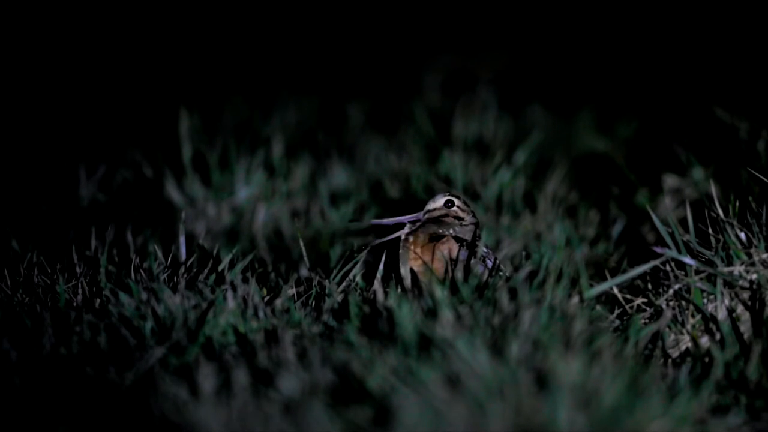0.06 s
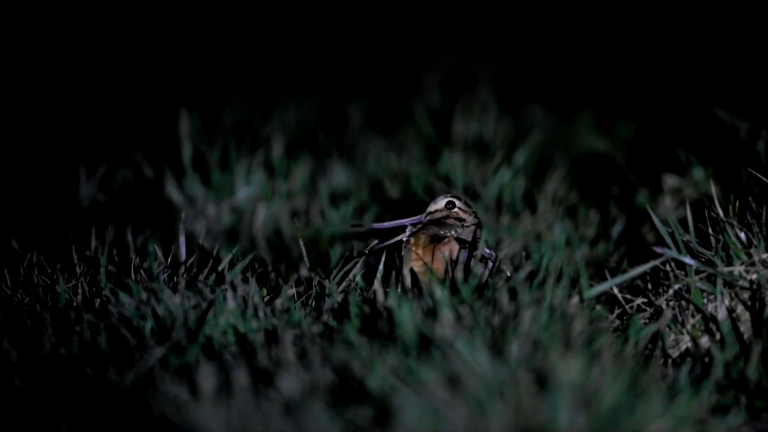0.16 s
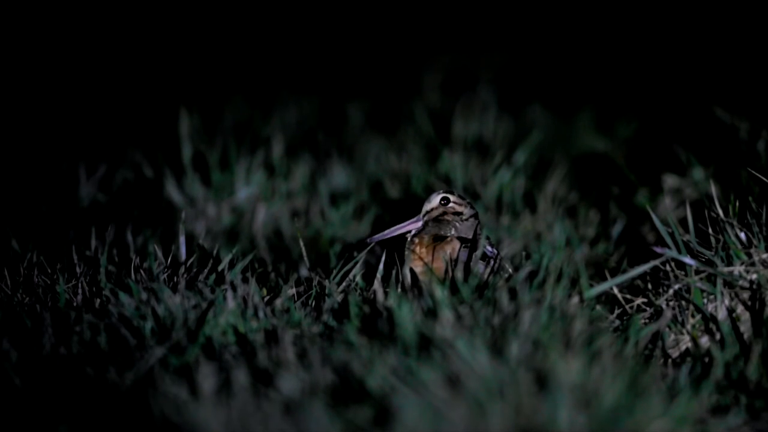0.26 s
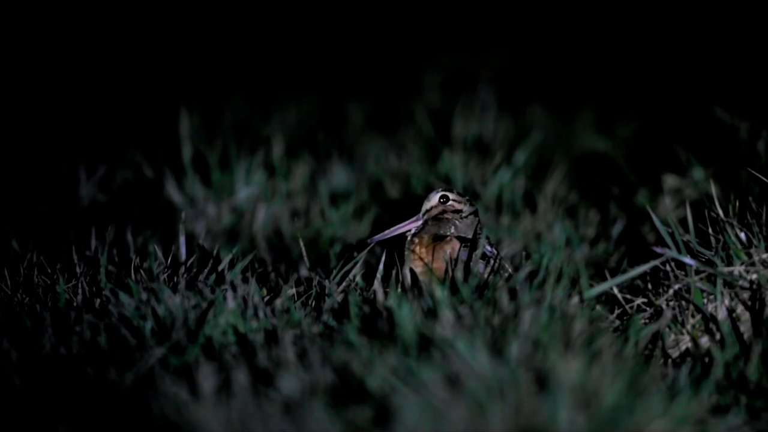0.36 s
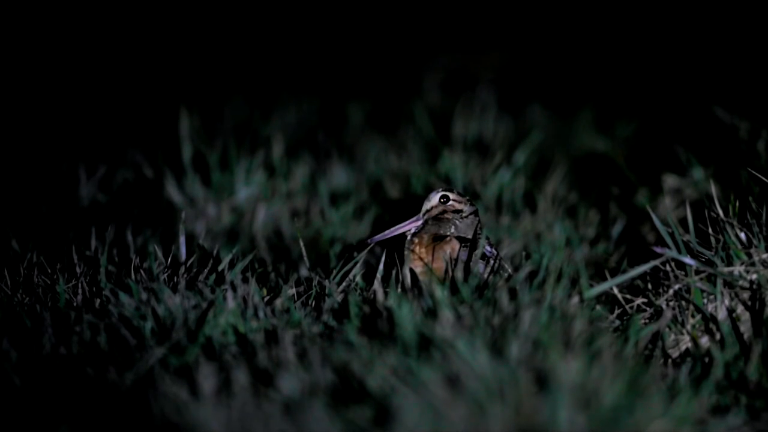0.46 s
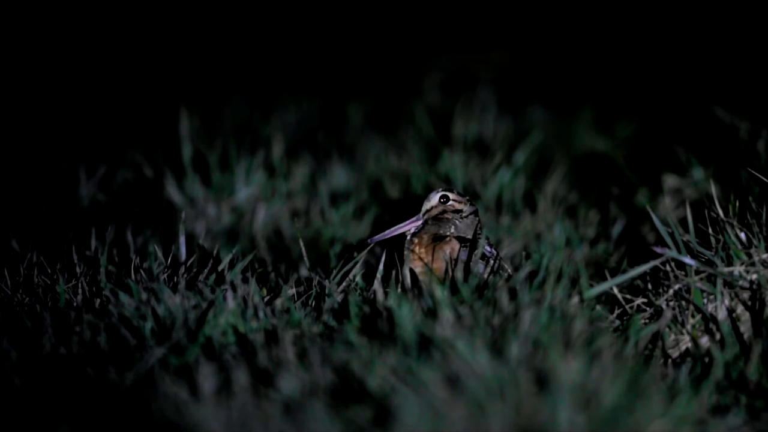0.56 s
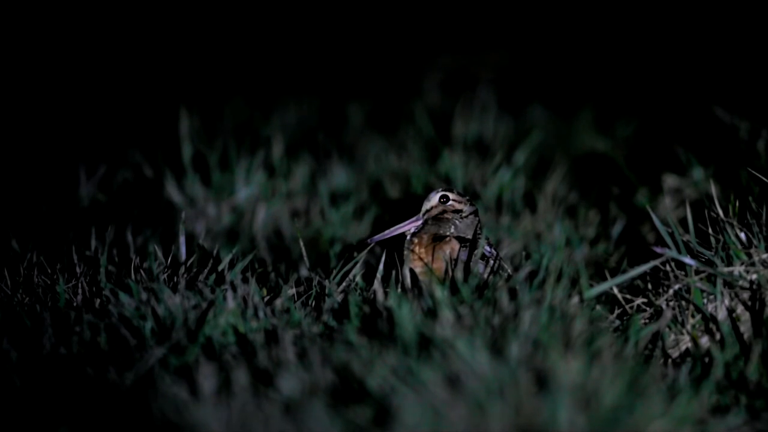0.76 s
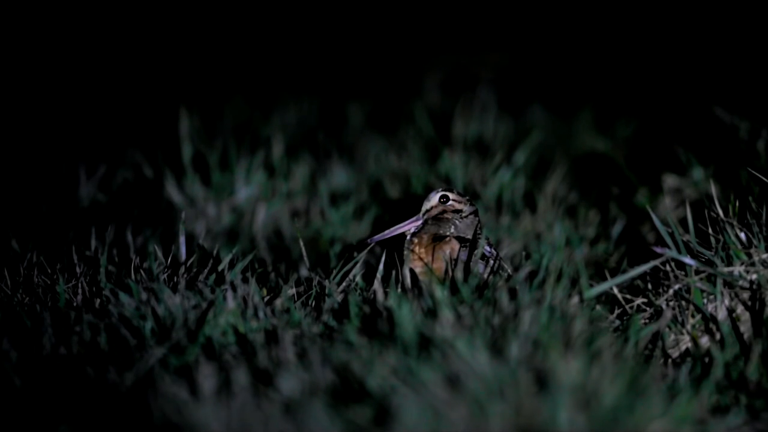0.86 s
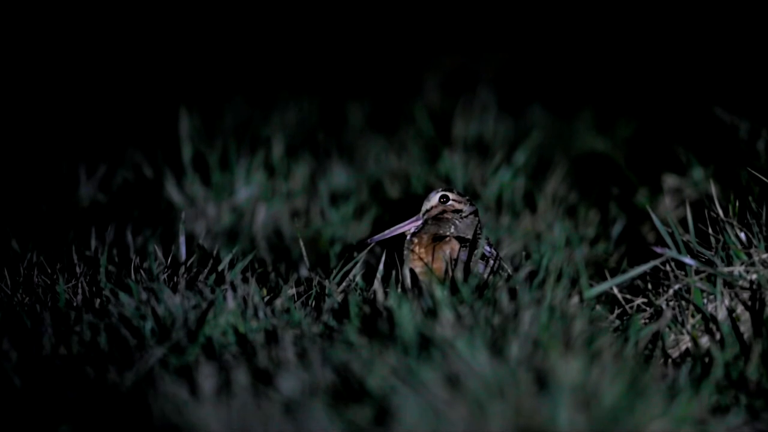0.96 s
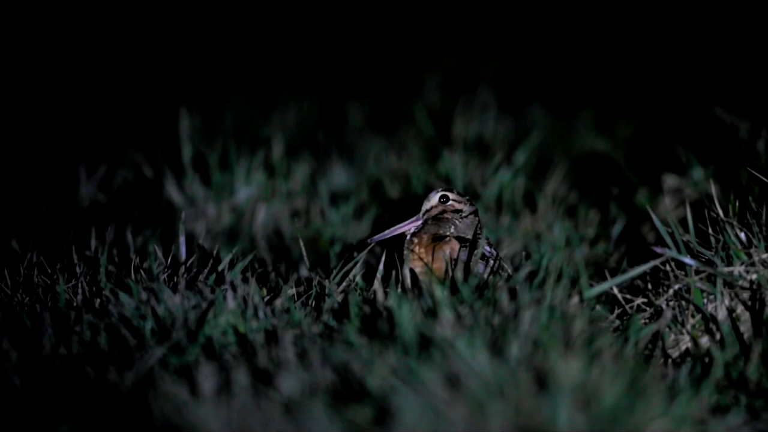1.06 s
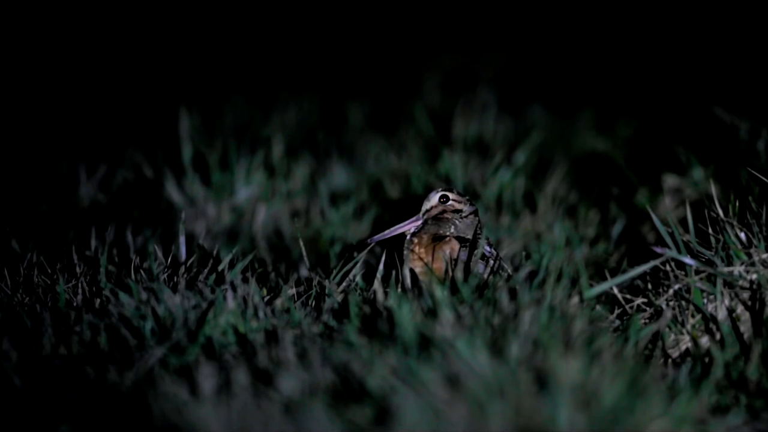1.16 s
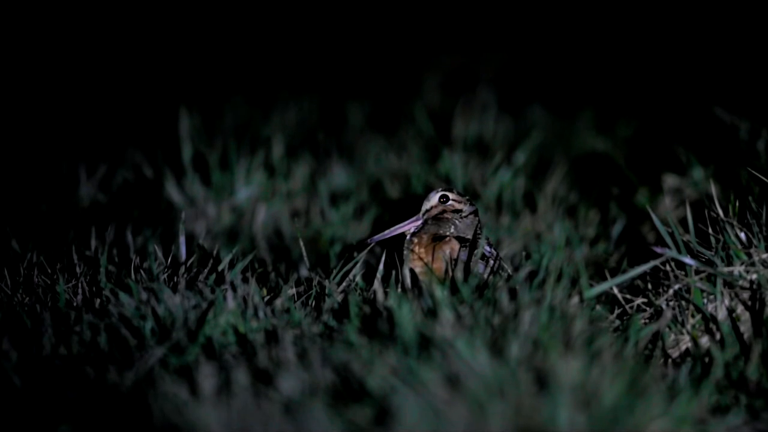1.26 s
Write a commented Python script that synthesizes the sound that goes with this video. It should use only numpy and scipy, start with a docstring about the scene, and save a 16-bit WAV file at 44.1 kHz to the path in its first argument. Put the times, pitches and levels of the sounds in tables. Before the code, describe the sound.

One short nasal buzz from a nearby bird, with faint frogs peeping far away.

```python
"""A meadow at night, the microphone close to a woodcock in the grass.
From the start, small frogs peep in rising whistles from a far marsh, over a low rumble and faint hiss.
The bird gives a soft hiccup, then at 0.2 s one buzzy, nasal peent: a train of sharp pulses ringing
a throat resonance that rises and falls with effort. The frogs carry on, and stalks tick now and then."""
import sys
import numpy as np
from scipy import signal
from scipy.fft import rfft, irfft
from scipy.io import wavfile

SR = 44100
rng = np.random.default_rng(int(sys.argv[2]) if len(sys.argv) > 2 else 0)


def int16_out(signal):
    """Quantize to a 16-bit WAV file."""
    q = np.round(np.clip(np.atleast_2d(signal).T, -1, 1) * 32767)
    wavfile.write(sys.argv[1], SR, q.astype(np.int16))


N = 57330


def from_db(db):
    """Decibels to gain."""
    return 10 ** (np.asarray(db) / 20)


def unit_rms(x):
    """Scale to an rms of 1."""
    return x / np.sqrt(np.mean(x ** 2) + 1e-20)


def seconds():
    """Time of every sample."""
    return np.arange(N) / SR


def curve(rows, t):
    """Read a table along straight lines."""
    return np.interp(t, *np.transpose(rows))


def colour(x, points):
    """Causal (minimum-phase) filter through points of freq_hz, gain_db."""
    size = 2 * N
    hz, db = np.transpose(points)
    bins = np.maximum(np.fft.rfftfreq(size, 1 / SR), 1)
    gain = from_db(np.interp(np.log(bins), np.log(hz), db))
    cepstrum = irfft(np.log(gain))
    cepstrum[1:N] *= 2
    cepstrum[N + 1:] = 0
    return irfft(rfft(x, size) * np.exp(rfft(cepstrum)))[:N]


def narrow_noise(hz, width_hz):
    """Steady noise passed twice through one resonance; rms 1."""
    r = np.exp(-np.pi * width_hz / SR)
    b, a = [1 - r, 0, r - 1], [1, -2 * r * np.cos(2 * np.pi * hz / SR), r * r]
    once = signal.lfilter(b, a, rng.standard_normal(2 * N))
    return unit_rms(signal.lfilter(b, a, once)[N:])


def scatter(x, t60_s, delay_s=.002):
    """Many weak reflections that die away, in a tail of unit energy."""
    t = seconds()
    tail = rng.standard_normal(N) * from_db(-60 * t / t60_s) * (t > delay_s)
    return signal.fftconvolve(x, tail / np.linalg.norm(tail))[:len(x)]


def glide(t, length_s, hz, hz_per_s):
    """A smoothly swelling, gliding whistle centred on t = 0."""
    swell = np.cos(np.pi * np.clip(t / length_s, -.5, .5))
    return swell * np.sin(2 * np.pi * (hz * t + hz_per_s * t * t / 2 + rng.random()))


def night_air(level_db=-53):
    """Distant rumble and steady hiss, with a wavering low drone."""
    # spectrum of the rumble and air: freq_hz, relative_db
    spectrum = [(25, -14.5), (45, -4), (80, 1.5), (125, 0), (185, -4), (250, -13.5), (400, -17),
                (900, -13.5), (1400, -16.5), (2000, -21.5), (3300, -23.5), (4500, -28.5), (8000, -27),
                (15500, -32.5)]
    # tones of the far drone: pitch_hz, level_db
    drone = [(121, -62), (196, -63.5)]
    air = from_db(level_db) * unit_rms(colour(rng.standard_normal(N), spectrum))
    return air + sum(from_db(db) * narrow_noise(hz, width_hz=7) for hz, db in drone)


def frogs():
    """Rising peeps: a few stand out, the rest blur into a chorus across the marsh."""
    # the nearer frogs: centre_s, pitch_hz, level_db
    peeps = [(.05, 2586, -56), (0.161, 2838, -57.5), (0.319, 2706, -50), (.36, 2386, -59),
             (.5, 2622, -60.5), (.5, 2930, -63), (0.619, 2769, -51.5), (.76, 2580, -54), (0.801, 2993, -61),
             (0.858, 2804, -53.5), (.94, 2758, -57.5), (1.06, 2626, -57), (1.138, 2775, -53.5),
             (1.208, 2550, -53), (1.23, 2897, -56)]
    peep_s, rise_hz_per_s = .19, 1153
    marsh_t60_s, wet = .59, .87
    chorus_per_s, chorus_hz, spread_hz, chorus_db = 90, 2682, 250, -58.5
    t = np.arange(-N // 2, N) / SR  # an early start, so the chorus is already full at 0 s
    near = sum(from_db(db) * glide(t - s, peep_s, hz, rise_hz_per_s) for s, hz, db in peeps)
    near = (near + wet * scatter(near, marsh_t60_s)) / np.hypot(1, wet)
    slots = np.arange(t[0], t[-1], 1 / chorus_per_s)
    far = sum(glide(t - s - late / chorus_per_s, peep_s, chorus_hz + spread_hz * sharp, rise_hz_per_s)
              for s, (late, sharp) in zip(slots, rng.uniform(-1, 1, (len(slots), 2))))
    chorus = unit_rms(scatter(far, marsh_t60_s)[-N:])
    return near[-N:] + from_db(chorus_db) * chorus


def hiccup():
    """Before the call, the bird gives a short hollow hoot and three falling gulps."""
    # the hoot and gulps: centre_s, length_s, start_hz, end_hz, level_db
    notes = [(.007, 0.027, 724, 732, -40), (0.056, 0.011, 720, 500, -52.5),
             (0.0793, 0.012, 726, 440, -42.5), (.101, 0.0074, 680, 458, -44.5)]
    # partials of each note: pitch_ratio, relative_db
    partials = [(.5, -14), (1, 0.5), (1.5, -17)]
    t, out = seconds(), np.zeros(N)
    for s, length_s, start_hz, end_hz, db in notes:
        hz, hz_per_s = (start_hz + end_hz) / 2, (end_hz - start_hz) / length_s
        for ratio, partial_db in partials:
            out += from_db(db + partial_db) * glide(t - s, length_s, ratio * hz, ratio * hz_per_s)
    return out


def meadow(x, grass_db=-15, edge_db=-22):
    """Bird to microphone: direct sound, close bounces, grass scatter, a return from the field's edge."""
    # stalks throw back mostly the short waves: freq_hz, gain_db
    stalks = [(600, -6), (3000, -7), (4300, -4), (5300, 0), (6500, -3), (14000, -3)]
    # bounces off the ground and nearby tufts: delay_s, gain_db
    paths = [(.0017, -14.5), (.0023, -37), (.0034, -41)]
    t, thrown = seconds(), colour(x, stalks)
    bounces = sum(from_db(db) * np.interp(t - delay, t, thrown, left=0) for delay, db in paths)
    grass = from_db(grass_db) * scatter(thrown, t60_s=.035)
    edge = from_db(edge_db) * scatter(thrown, t60_s=.32)
    return x + bounces + grass + edge


def grass_ticks():
    """Stalks give tiny dry snaps and rustles."""
    # ticks in the grass: start_s, centre_hz, level_db, decay_s
    ticks = [(0.113, 7100, -54, 0.0032), (0.538, 6400, -56.5, 0.0072), (.565, 6800, -65.5, 0.038),
             (.675, 10500, -53, .0012), (.777, 11600, -49.5, 0.00087), (1.262, 5550, -63.5, 0.02)]
    t, out = seconds(), np.zeros(N)
    for s, hz, db, decay_s in ticks:
        envelope = (t > s) * np.exp(-np.abs(t - s) / decay_s)
        out += from_db(db) * envelope * narrow_noise(hz, width_hz=2500)
    return out


def peent():
    """Each pulse snaps and rings the throat for about a millisecond; the bill colours the ring."""
    # pace of the buzz, first pulse to last: time_s, pulses_per_s
    pulse_rate = [(.1927, 148), (.206, 169), (.221, 167), (.234, 183.3), (.26, 185.9), (.315, 185.1),
                  (.376, 178.7), (.3895, 146)]
    # strength of the pulses: time_s, relative_db
    effort = [(.193, -13), (.2, -11.5), (.212, -3.5), (.224, 1), (.28, 4), (.312, 2), (.33, 3), (.368, 2),
              (.376, -3), (.382, -8), (.388, -21)]
    # throat resonance, sharpest at the ends of the call: time_s, centre_hz, width_hz
    throat = [(.193, 3560, 330), (.206, 4150, 450), (.222, 4680, 620), (.25, 4960, 760), (.29, 5100, 850),
              (.335, 5130, 880), (.372, 4930, 850), (.382, 4300, 600), (.389, 3600, 500)]
    # colour of windpipe and bill: freq_hz, gain_db
    bill = [(1000, -9), (2500, -9), (3300, -5), (4000, -3), (5000, 0), (5600, 0), (6300, 2), (6600, -2),
            (7100, -12), (9000, -14), (15000, -20)]
    # the bare snap of a pulse, a hollow thump and a bright rasp: freq_hz, gain_db
    snap = [(120, -14), (250, -37), (370, -9.5), (555, -7.5), (1110, -8), (1400, -20.5), (1850, -19),
            (2200, -22.5), (4800, -24.5), (6100, -11.5), (7100, -17), (9300, -21.5), (10800, -34.5),
            (11700, -35.5), (12700, -36), (14200, -27.5), (15600, -24)]
    ring_db, attack_s = -5.5, .00019
    jitter_s, shimmer_db, wobble_share = .000002, .95, .0099  # random from pulse to pulse
    snap_follows = .46  # share of the pulses' swing in dB that the snap follows
    t = seconds()
    span = t[(t >= pulse_rate[0][0]) & (t <= pulse_rate[-1][0])]
    cycles = np.cumsum(curve(pulse_rate, span)) / SR
    starts = np.interp(np.arange(int(cycles[-1]) + 1), cycles, span)
    throat_s, throat_hz, throat_width_hz = np.transpose(throat)
    rings, snaps = np.zeros(N), np.zeros(N)
    for start, (early, strong, sharp) in zip(starts, rng.standard_normal((len(starts), 3))):
        since = t - start + jitter_s * early
        age = np.clip(since, 0, .1)
        detune = np.clip(wobble_share * sharp, -.01, .01)
        hz = np.interp(start, throat_s, throat_hz) * (1 + detune)
        width_hz = np.interp(start, throat_s, throat_width_hz)
        strength = from_db(curve(effort, start) + shimmer_db * strong)
        envelope = (1 - np.exp(-age / attack_s)) * np.exp(-np.pi * width_hz * age)
        rings += strength * envelope * np.sin(2 * np.pi * hz * age)
        snaps += strength ** snap_follows * np.sinc(since * SR)
    return from_db(ring_db) * colour(rings, bill) + colour(snaps, snap)


def scene():
    """One microphone: the bird close by, the frogs and the night behind it."""
    return (night_air() + grass_ticks() + meadow(peent() + hiccup()) + frogs())[None]


def record(dry):
    """The recorder cuts the treble steeply above 15.9 kHz."""
    return signal.sosfilt(signal.ellip(12, .1, 80, 15900, fs=SR, output="sos"), dry)


dry = scene()
out = record(dry)
int16_out(out)
```